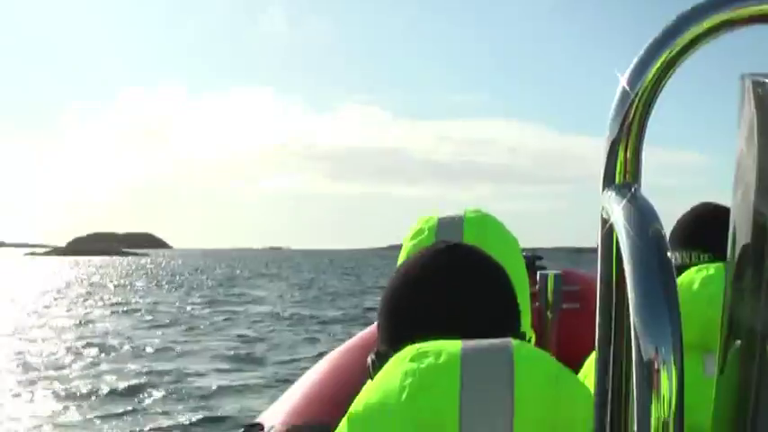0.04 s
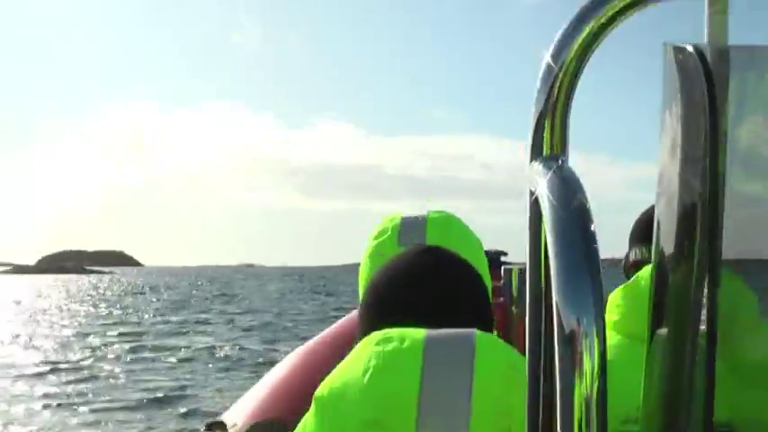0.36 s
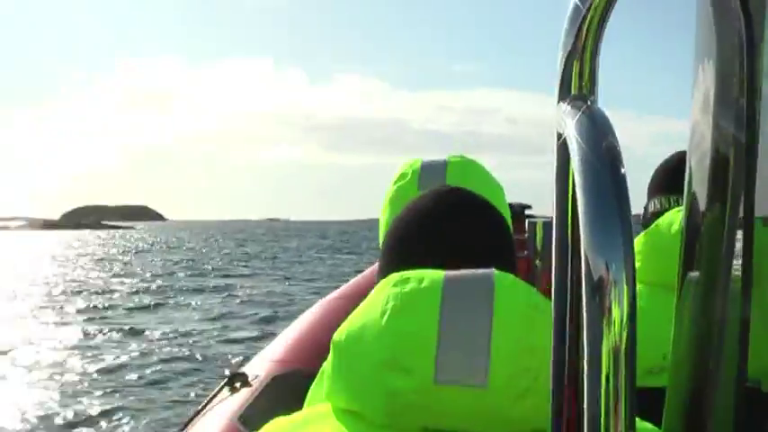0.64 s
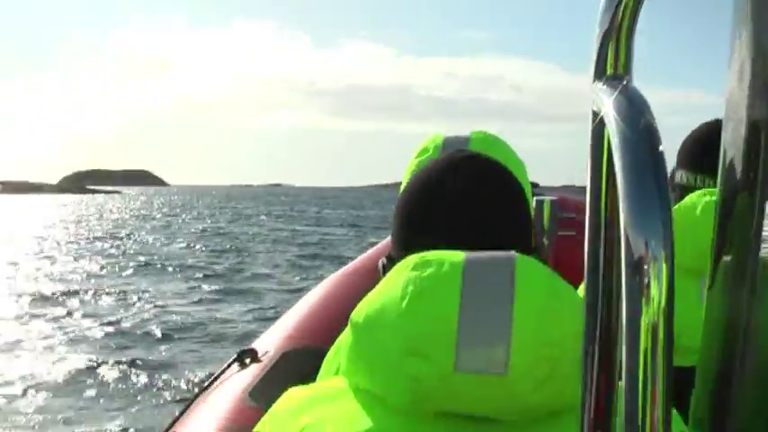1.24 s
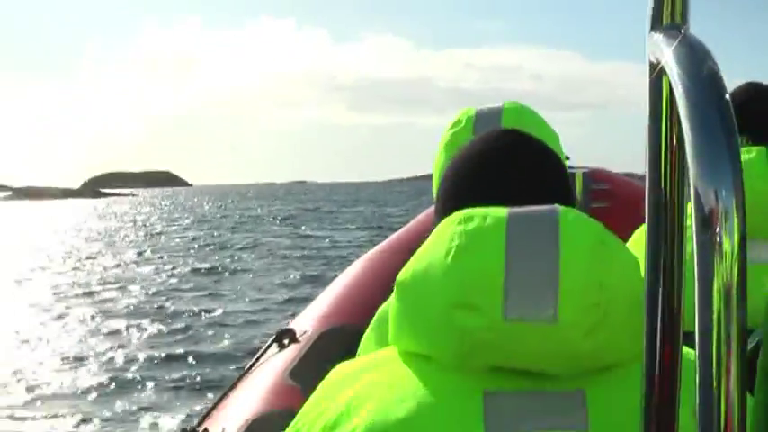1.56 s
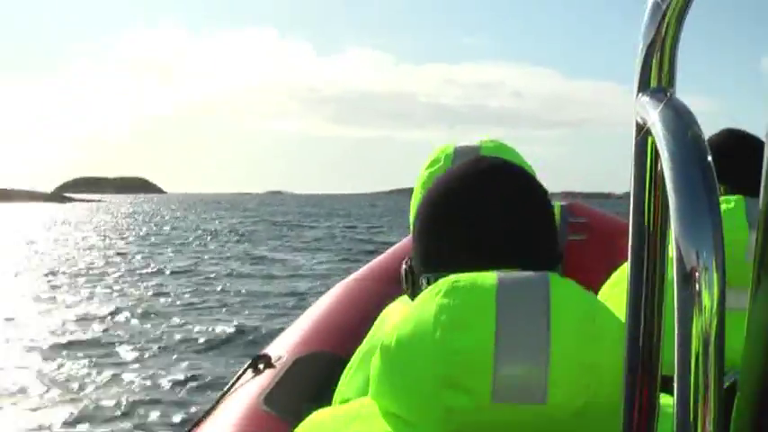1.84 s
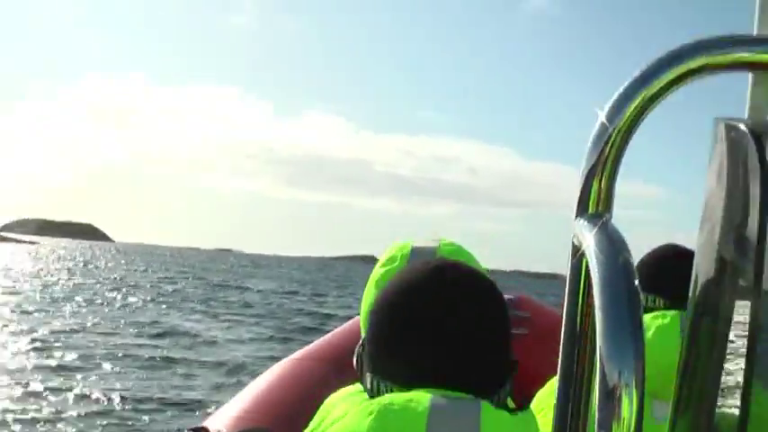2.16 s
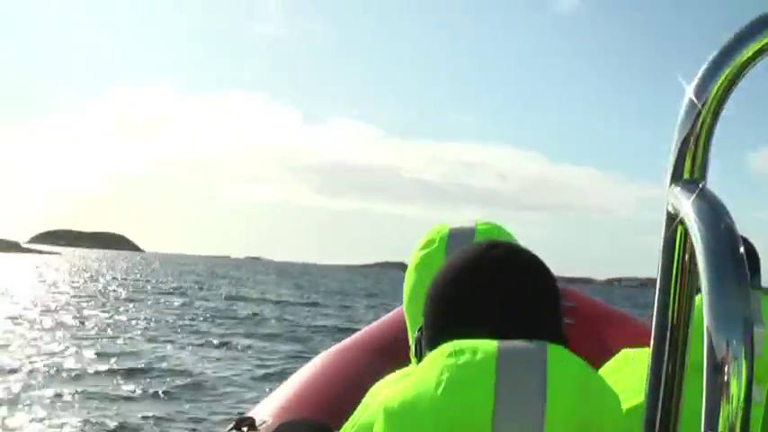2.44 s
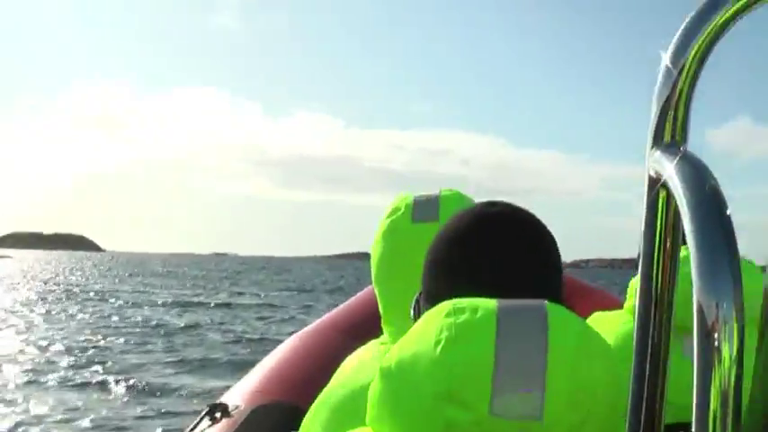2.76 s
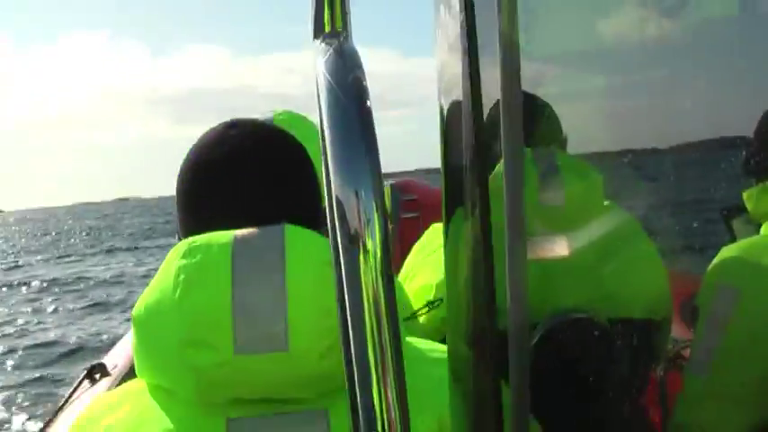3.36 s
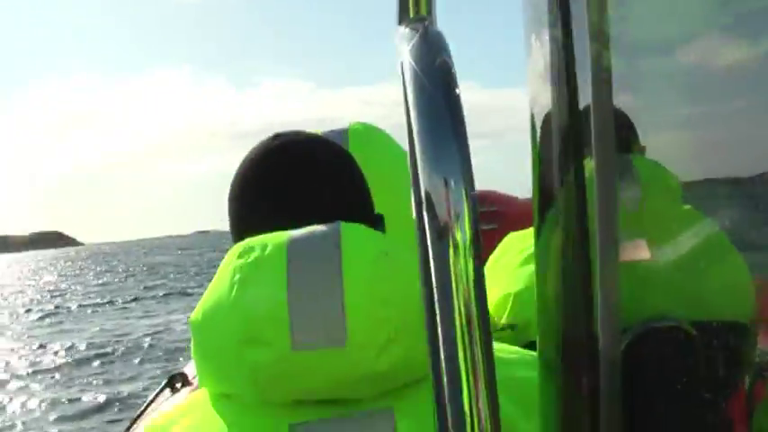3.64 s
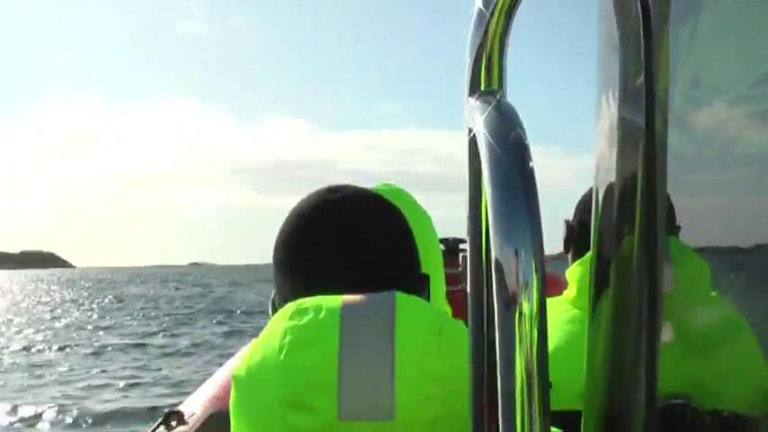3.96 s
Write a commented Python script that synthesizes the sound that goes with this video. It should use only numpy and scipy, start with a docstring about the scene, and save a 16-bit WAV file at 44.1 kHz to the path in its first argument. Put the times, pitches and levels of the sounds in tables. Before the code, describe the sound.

Wind roars on the microphone over rushing water and a boat's low motor drone.

```python
"""Wind roars and rumbles right on the microphone of a camera aboard a fast inflatable boat.
The boat runs over a choppy sea: close by, a wash rushes along the hull under a fluttering wind hiss,
while the outboard motor drones underneath and a faint whine sits high in the treble.
Buffets of air thump the microphone and make its limiter duck the hiss for a moment."""
import sys
import numpy as np
from scipy import signal
from scipy.fft import rfft, irfft, next_fast_len
from scipy.io import wavfile
from scipy.ndimage import uniform_filter1d, map_coordinates

SR = 44100
rng = np.random.default_rng(int(sys.argv[2]) if len(sys.argv) > 2 else 0)


def log_audio(samples):
    """Write samples as a 16-bit WAV file to the path given in sys.argv[1]."""
    # one column per channel
    frames = np.atleast_2d(samples).T
    # limit to full scale, then quantise
    limited = np.clip(frames, -1, 1)
    pcm = np.round(limited * 32767).astype(np.int16)
    wavfile.write(sys.argv[1], SR, pcm)


N = 176400


def amp(db):
    """Decibels to gain."""
    return 10 ** (np.asarray(db) / 20)


def unit(x):
    """Scale to rms 1."""
    return x / np.sqrt(np.mean(x ** 2) + 1e-20)


def gain_at(spectrum, hz):
    """Gain at hz, read from (frequency [Hz], level [dB]) points on a log frequency axis."""
    points_hz, points_db = np.transpose(spectrum)
    return amp(np.interp(np.log(hz + 1), np.log(points_hz + 1), points_db))


def curve(rows):
    """(time [s], value) points as one value per sample."""
    return np.interp(np.arange(N) / SR, *np.transpose(rows))


def wobble(rate):
    """A smooth random curve, rate knots a second."""
    knots = rng.standard_normal(int(N * rate / SR) + 4)
    return map_coordinates(knots, [np.arange(N) * rate / SR])


def filtered(x, response):
    """Filter x by a gain given as a function of frequency."""
    size = next_fast_len(N + SR // 2)
    return irfft(rfft(x, size) * response(np.fft.rfftfreq(size, 1 / SR)), size)[..., :N]


def rush(spectrum, patchy_db):
    """Flow noise of rms 1 with patches of random gain; it starts mono, then widens, leaning right."""
    # stereo width, side over mid, before the opening applies: (frequency [Hz], level [dB])
    width = [(30, -24), (100, -42), (200, -31), (350, -21), (650, -10.5), (1200, -6), (2200, -8.5),
             (3500, -9.5), (4600, -15.5), (6000, -40.5), (8000, -25)]
    # left over right, before the opening applies: (frequency [Hz], level [dB])
    lean = [(150, 0), (330, -.7), (700, -1.6), (1300, -2), (2500, 0)]
    # opening of the stereo image: (time [s], side gain [dB])
    opening = [(.1, -52), (.25, -15), (.45, -4.5), (1.2, -1.5), (2.0, -0.4), (2.9, 2.5), (4, 1.5)]
    mono_above_hz = 5800
    cells = signal.stft(rng.standard_normal((2, N)), nperseg=512)[2]
    patches = uniform_filter1d(rng.standard_normal(cells.shape[1:]), size=7, axis=0)
    patches = uniform_filter1d(patches, size=9, axis=1)
    noise = signal.istft(cells * amp(patchy_db * unit(patches)), nperseg=512)[1][:, :N]
    mid, diffuse = filtered(noise, lambda hz: gain_at(spectrum, hz))
    side = filtered(diffuse, lambda hz: gain_at(width, hz))
    side += filtered(mid, lambda hz: (gain_at(lean, hz) - 1) / 2)
    side = filtered(side, lambda hz: hz < mono_above_hz) * amp(curve(opening))
    return unit(np.array([mid + side, mid - side]))


def wind():
    """Air streaming over the microphone makes a lumpy rumble under a fluttering roar."""
    # strength of the rumble: (time [s], relative level [dB])
    rumble_level = [(.05, -24), (.2, -23), (.4, -25.5), (.6, -22), (1.1, -24.5), (1.4, -24), (1.8, -25.5),
                    (2.2, -24), (2.5, -25), (2.9, -24), (3.3, -27), (3.75, -29.5), (4, -26.5)]
    # colour of the rumble: (frequency [Hz], level [dB])
    rumble_spectrum = [(20, -33), (35, -9.5), (55, -8), (80, -7), (110, 0.5), (160, -2.5), (250, -9),
                       (500, -32), (1500, -84)]
    # strength of the roar: (time [s], relative level [dB])
    roar_level = [(.05, -21.5), (.15, -21), (.4, -22.5), (.6, -25.5), (.85, -24.5), (1.0, -24),
                  (1.55, -22.5), (1.68, -25), (1.8, -22.5), (2.3, -23), (2.55, -21.5), (2.75, -22.5),
                  (3.04, -22.5), (3.15, -26), (3.72, -24), (3.83, -27), (4, -28.5)]
    # colour of the roar: (frequency [Hz], level [dB])
    roar_spectrum = [(50, -41), (120, -10.5), (190, -0.5), (260, 1.5), (380, 1.5), (520, -1), (750, -5.5),
                     (1100, -15), (2500, -23.5), (8000, -54)]
    rumble = amp(curve(rumble_level) - 0.5 + wobble(9)) * rush(rumble_spectrum, patchy_db=-0.25)
    roar = amp(curve(roar_level) + 1 + 0.2 * wobble(19)) * rush(roar_spectrum, patchy_db=0.76)
    return rumble + roar


def buffets():
    """Each eddy that hits the microphone is a brief push of pressure with a low thump of the same length."""
    # eddies of air: (time [s], width [s], infrasonic push [dB], audible thump [dB])
    eddies = [(0.799, 0.0023, -5, -4), (.82, 0.058, -19, -28.5), (2.338, 0.0095, -6, -5),
              (2.442, 0.0055, -15, -10), (2.472, 0.0076, -20, -16), (3.025, 0.02, -30, -20.5),
              (3.19, 0.016, -13, -17.5), (3.216, .002, -6, -8), (3.505, 0.0086, -16, -17),
              (3.87, 0.0098, -19, -18.5), (3.891, 0.0065, -12.5, -7), (3.918, 0.0055, -7.5, -4)]
    # colour of the thump: (frequency [Hz], level [dB])
    thump_spectrum = [(20, -10), (45, -3), (75, -1.5), (115, 1), (170, -7), (260, -20), (600, -39),
                      (1500, -90)]
    t = np.arange(N) / SR
    push, thump = np.zeros(N), np.zeros(N)
    for peak_s, width_s, push_db, thump_db in eddies:
        pulse = np.exp(-.5 * ((t - peak_s) / width_s) ** 2)
        push += amp(push_db) * pulse
        thump += amp(thump_db) * pulse
    return push * amp(1.3 * wobble(60)) + thump * rush(thump_spectrum, patchy_db=-0.5)


def wash_and_hiss():
    """The wash along the hull and the ragged hiss of wind overloading the microphone share one flutter."""
    # water rushing along the hull: (time [s], relative level [dB])
    wash_level = [(.05, -26.5), (.4, -29.5), (.6, -30.5), (.82, -31.5), (.92, -28), (1.15, -28.5),
                  (1.64, -31.3), (2.1, -28), (2.45, -30.5), (2.75, -29), (3.03, -29), (3.14, -33.5),
                  (3.7, -34.5), (3.88, -35), (4, -37)]
    # colour of the wash: (frequency [Hz], level [dB])
    wash_spectrum = [(250, -30), (600, -1), (1000, 0.5), (1400, -2), (1900, -3.5), (2700, -9),
                     (3800, -14.5), (6000, -18.5), (12000, -37)]
    # wind hiss on the microphone: (time [s], relative level [dB])
    hiss_level = [(.05, -34), (.55, -34.5), (.78, -36.5), (1.0, -35.5), (1.35, -34), (2.2, -35.5),
                  (2.7, -35), (2.97, -35.5), (3.065, -31.5), (3.1, -39.5), (3.3, -38.5), (3.7, -39),
                  (3.83, -37.5), (4, -40)]
    # colour of the hiss: (frequency [Hz], level [dB])
    hiss_spectrum = [(1200, -27), (3000, 2.5), (4200, 0.5), (5300, 2), (6400, 0), (7400, -2), (8700, -1.5),
                     (9700, 0.9), (12500, 1.5), (15000, 1), (16000, -2.5)]
    flutter_db = wobble(260) + 0.5 * wobble(70) + 0.39 * wobble(18)
    wash = unit(amp(0.5 * flutter_db) * rush(wash_spectrum, patchy_db=0.56))
    hiss = unit(amp(flutter_db + 0.71 * wobble(1500)) * rush(hiss_spectrum, patchy_db=0.66))
    return amp(curve(wash_level) + 0.54) * wash + amp(curve(hiss_level) + 0.75) * hiss


def outboard_motor():
    """A rough drone whose speed wanders with the load on the propeller; it slowly sinks under the wind."""
    # motor speed: (time [s], firing rate [Hz])
    firing_rate = [(0, 176), (.35, 177), (.7, 162), (1.0, 175), (1.25, 156), (1.5, 167), (1.72, 146),
                   (2.05, 154), (2.45, 153), (2.9, 160), (3.6, 160), (4, 156)]
    # harmonics of the drone: (multiple of the firing rate, relative level [dB])
    orders = [(1, -3), (2, -10.5), (3, -14)]
    midway_db, fade_db_per_s = -33.5, 2.5
    flutter_db, speed_jitter = 6, 0.01493
    firing_hz = curve(firing_rate) * (1 + speed_jitter * wobble(30))
    phase = 2 * np.pi * np.cumsum(firing_hz) / SR
    drone = sum(amp(db + flutter_db * wobble(15)) * np.sin(order * phase) for order, db in orders)
    from_midway_s = (np.arange(N) - N / 2) / SR
    return amp(midway_db - fade_db_per_s * from_midway_s) * unit(drone)


def whine():
    """A thin, faint whine: a narrow band of noise high in the treble."""
    centre_hz, half_width_hz, level_db = 13026, 22, -55.5
    band = filtered(rng.standard_normal(N), lambda hz: 1 / (1 + ((hz - centre_hz) / half_width_hz) ** 2))
    return amp(level_db) * unit(band)


def scene():
    """Everything that reaches the microphone on board."""
    return wind() + buffets() + wash_and_hiss() + outboard_motor() + whine()


def record(dry):
    """The camera: a fast limiter that ducks the treble hardest, low-cut, soft clip, switch-on, top cut."""
    limit_db, window_s, treble_above_hz, treble_exponent = -15, 0.002, 1100, 1.8
    low_cut_hz, clip_db, top_hz = 30, -5, 15950
    start_s, fade_in_s = 0.042, 0.013
    power = uniform_filter1d(np.mean(dry, axis=0) ** 2, size=int(window_s * SR))
    gain = (1 + (power / amp(limit_db) ** 2) ** 2) ** -0.25
    bass = filtered(dry, lambda hz: 1 / (1 + (hz / treble_above_hz) ** 2))
    limited = bass * gain + (dry - bass) * gain ** treble_exponent
    low_cut = filtered(limited, lambda hz: hz ** 4 / (hz ** 4 + low_cut_hz ** 4))
    clipped = low_cut / (1 + (low_cut / amp(clip_db)) ** 6) ** (1 / 6)
    switch_on = np.clip((np.arange(N) / SR - start_s) / fade_in_s, 0, 1)
    return filtered(clipped * switch_on, lambda hz: hz < top_hz)


dry = scene()
out = record(dry)
log_audio(out)
```